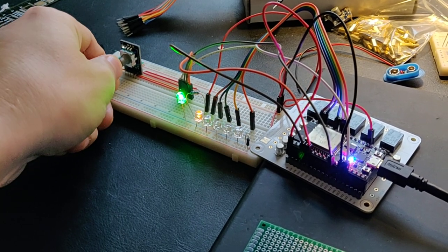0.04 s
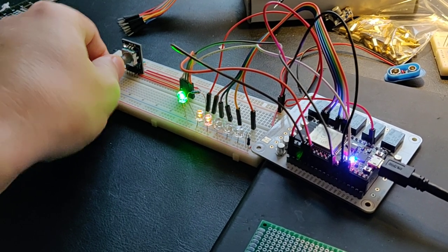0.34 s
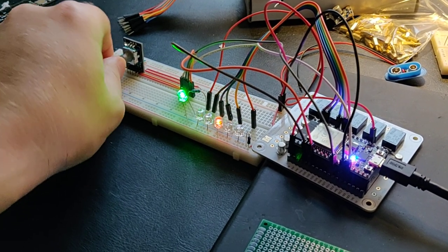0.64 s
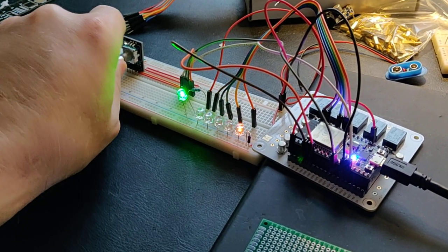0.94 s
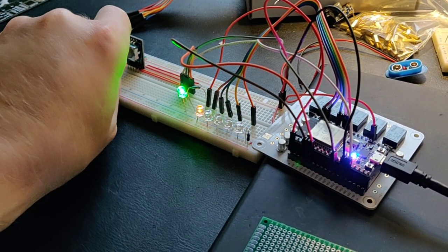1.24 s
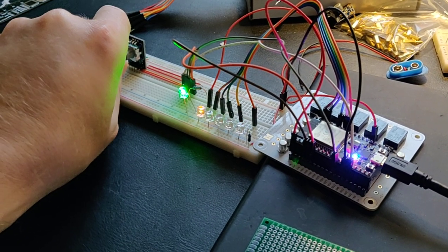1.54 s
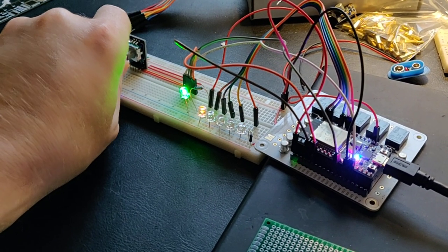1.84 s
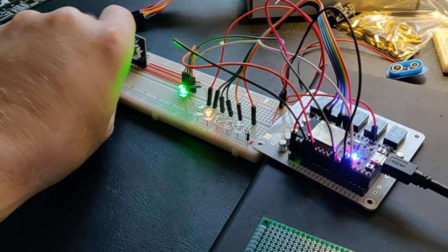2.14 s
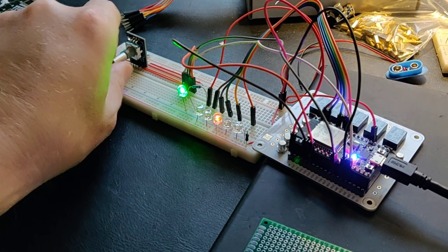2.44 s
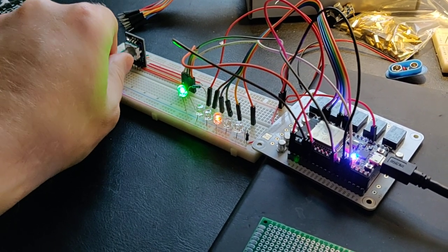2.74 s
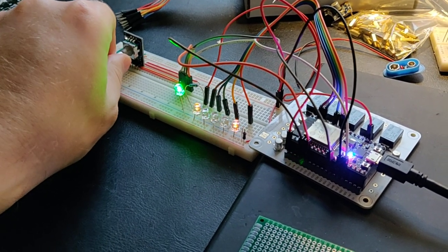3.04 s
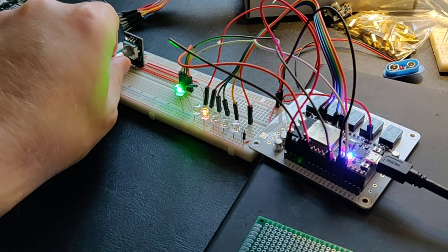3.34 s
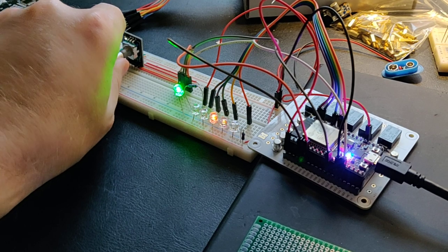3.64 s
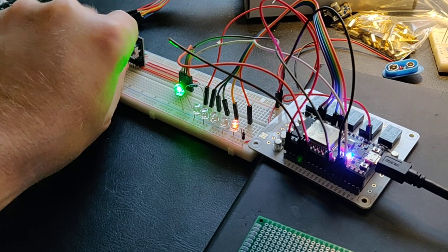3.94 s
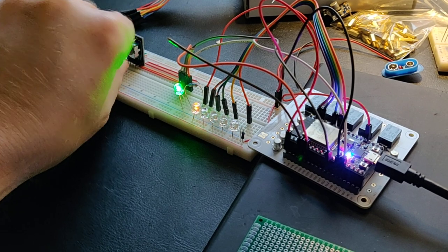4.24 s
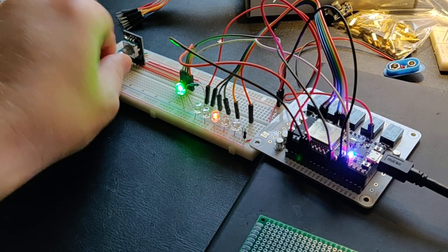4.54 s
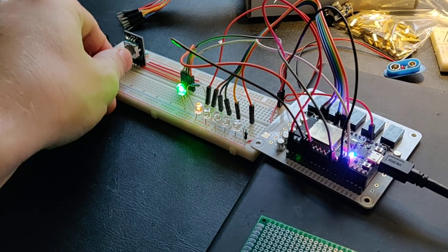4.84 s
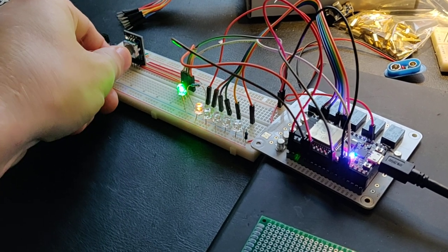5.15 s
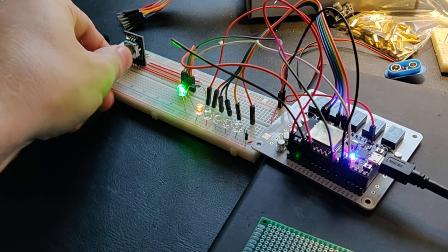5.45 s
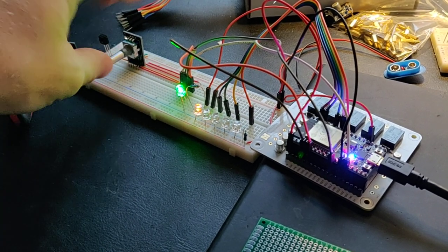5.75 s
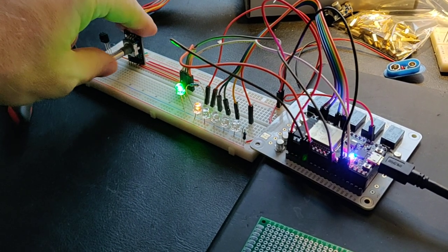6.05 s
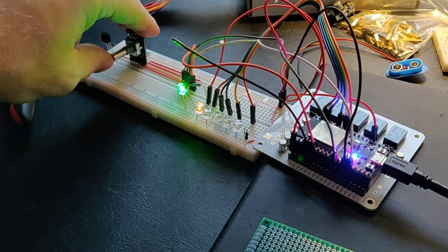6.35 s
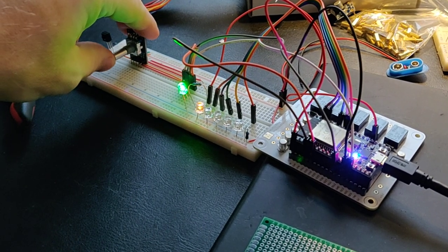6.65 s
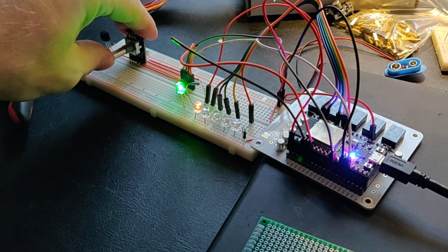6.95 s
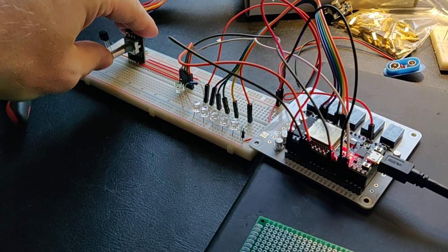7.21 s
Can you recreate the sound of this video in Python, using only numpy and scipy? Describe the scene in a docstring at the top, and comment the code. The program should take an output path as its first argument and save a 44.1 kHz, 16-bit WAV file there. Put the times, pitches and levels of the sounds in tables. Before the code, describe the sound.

Small relays click sharply one after another, then a few dull knocks and a last click, in a quiet room.

```python
"""Five small relays on a workbench click over in turn as a hand turns a knob, in a quiet room. Each armature
touches, slams home and bounces, ringing its own case; the room adds a short bright tail. Fingers brush the
board. The knob turns back and the relays drop out; it is then pressed in with a faint knock and two dull
knocks, and one more click follows. Air, hiss and a faint hum lie underneath."""
import sys
import numpy as np
from scipy import signal
from scipy.fft import rfft, irfft
from scipy.io import wavfile

SR = 44100
rng = np.random.default_rng(int(sys.argv[2]) if len(sys.argv) > 2 else 0)


def master(y):
    """Save y as 16-bit WAV."""
    cut = np.clip(np.atleast_2d(y).T, -1, 1)
    pcm = np.round(cut * 32767)  # scale
    wavfile.write(sys.argv[1], SR, pcm.astype(np.int16))


N = 329868
FFT_SIZE = 8192
HZ = np.fft.rfftfreq(FFT_SIZE, 1 / SR)
SIDES = np.array([[1], [-1]]) / 2  # splits a left-right level over the channels

# armature landings, relays 1-5:
# (body [dB], top [dB], accent [Hz], accent [dB], bounce gap [ms], rebound [0-1])
LANDINGS = [(-0.8, 6, 6500, 7, 1.1, 0.38), (-2.5, -3.5, 3600, -2.5, 0.562, 0.55),
            (-1, -0.3, 5660, 3.5, 1.42, 0.37), (1, 3, 5760, -2.5, 1.36, 0.57),
            (-3, 4.5, 5170, -5, 1.0, 0.66)]


def amp(db):
    """Decibels to gain."""
    return 10 ** (np.asarray(db) / 20)


def unit_rms(x):
    """Scales to rms 1."""
    return x / np.sqrt(np.mean(x ** 2) + 1e-20)


def curve_at(points, hz):
    """Interpolates a table over log frequency."""
    points_hz, values = np.transpose(points)
    return np.interp(np.log(hz + 1), np.log(points_hz + 1), values)


def add(mix, start_s, sound):
    """Mixes a sound in at start_s."""
    part = mix[max(round(start_s * SR), 0):][:len(sound)]
    part += sound[:len(part)]


def causal(gain):
    """Minimum-phase response of a passive body: sharp attack, ringing after."""
    log_gain = np.log(np.maximum(gain, 1e-5))
    mirrored = np.r_[log_gain, log_gain[-2:0:-1]]
    return np.exp(np.conj(signal.hilbert(mirrored))[:len(log_gain)])


def colour(x, curves_db):
    """Filters each of two channels by its own curve."""
    taps = np.array([irfft(causal(amp(db))) for db in curves_db])
    return signal.fftconvolve(np.atleast_2d(x), taps, axes=1)[:, :x.shape[-1]]


def resonances(modes):
    """Gain of a body whose modes add in power."""
    return np.sqrt(sum(amp(db) ** 2 / (1 + (2 * (HZ - hz) / width_hz) ** 2)
                       for hz, width_hz, db in modes))


def bounces(gap_ms, rebound):
    """Light touch, slam, dying bounces: an all-pass, spread in time, even in colour."""
    delay = np.exp(-2j * np.pi * HZ * gap_ms / 1000)
    return (delay - rebound) / (1 - rebound * delay)


def relay_click(number, db, body_db, top_db, accent_hz, accent_db, bounce_ms, rebound, blur_hz=0):
    """The armature bounces and the contacts chatter, ringing one relay's case."""
    # case modes: (frequency [Hz], width [Hz], level [dB])
    case_1 = [(1013, 61, -10.5), (1570, 160, -10.5), (2254, 29, -2.5), (3240, 230, -2.5), (3760, 80, -0.5),
              (4112, 65, 6), (5040, 45, 7), (5470, 970, -2.5), (5810, 200, 0), (6360, 71, 0.5),
              (6400, 18, -1), (6900, 77, -1), (7200, 79, -7), (8160, 1450, -10), (12600, 740, -11.5),
              (14000, 1200, -10.5), (15450, 217, -14.5)]
    case_2 = [(1065, 67, -4), (1527, 102, 4), (2260, 48, 3.5), (3380, 146, 4), (3790, 56, 3.5),
              (4080, 104, 6.5), (5060, 20, 10.6), (5440, 460, 0.8), (6220, 40, 3.5), (6500, 27, 6.5),
              (6850, 330, -11.5), (8230, 180, -3.5), (8800, 298, -11), (12200, 620, 0), (13300, 198, -6),
              (14900, 770, 4.5)]
    case_3 = [(1055, 71, -5.5), (1610, 200, -4.3), (2240, 77, -2.5), (2980, 364, -10), (3470, 61, 4),
              (4106, 50, 11.5), (4850, 230, 3), (5240, 71, 9.5), (5530, 54, -11), (6120, 77, 5.5),
              (6800, 560, -4.5), (8194, 54, -2.5), (9100, 375, -6), (11200, 390, -9), (13200, 670, -4.5),
              (15200, 452, -0.5)]
    case_4 = [(949, 150, -19), (2270, 83, -4.5), (2710, 60, -2.5), (3230, 100, -8), (3268, 12, 10.5),
              (4085, 50, 8), (4950, 88, 6.5), (5480, 120, 3), (6010, 140, 4), (6330, 168, -1.5),
              (6820, 88, 4.5), (7100, 110, -9), (8880, 580, -5.5), (11519, 230, -9.5), (12802, 900, -10),
              (13900, 217, -6), (15100, 241, -7.5)]
    case_5 = [(940, 230, -11), (1560, 160, -6.5), (2255, 58, -1.5), (2630, 33, -0.5), (3570, 230, -1.5),
              (4070, 57, 10), (4920, 71, 8.5), (5070, 81, 11.5), (5600, 92, -2.5), (6340, 79, -2),
              (6680, 550, 1), (7220, 130, -1), (7880, 600, -7), (11550, 190, -9.5), (13000, 710, -13.5),
              (15122, 649, -10)]
    # a small case radiates little bass: (frequency [Hz], gain [dB])
    radiation = [(60, -45), (200, -26), (700, -1.5), (1000, 1.5)]
    case = [case_1, case_2, case_3, case_4, case_5][number - 1]
    # blur widens each mode at constant energy
    modes = [(hz, width_hz + blur_hz, mode_db - 10 * np.log10(1 + blur_hz / width_hz))
             for hz, width_hz, mode_db in case]
    tilt_db = curve_at([(2000, body_db), (5000, 0.0067), (8000, 0), (13000, top_db)], HZ)
    # the landing favours or starves one part of the case
    landing_db = accent_db * np.exp(-((HZ - accent_hz) / 280) ** 2)
    gain = resonances(modes) * amp(db + tilt_db + landing_db + curve_at(radiation, HZ))
    chatter = bounces(gap_ms=0.298, rebound=0.46)
    return irfft(bounces(bounce_ms, rebound) * chatter * causal(gain))


def dying_click(age_s=0.087, db=-2.5):
    """Room tail of a click made just before the scene opens."""
    early = np.zeros(N + SR)
    add(early, 1 - age_s, relay_click(1, db, *LANDINGS[0]))
    return room(early, early)[:, SR:]


def hush(air_db=-55):
    """Steady room air, microphone hiss and a faint wavering hum."""
    # air and hiss: (frequency [Hz], relative density [dB])
    spectrum = [(12, -25), (20, 5.5), (48, -10.5), (65, -10), (123, -15), (210, -15), (270, -16),
                (367, -19), (542, -24.5), (923, -28.5), (1960, -28), (3250, -33.5), (6010, -32.5),
                (8410, -41), (16000, -41.5)]
    # (frequency [Hz], left-right correlation [-1..1])
    likeness = [(60, 0.6), (130, 0.58), (290, 0.93), (640, 0.24), (1410, 0.032), (3100, -0.085),
                (6820, 0.028), (15000, -0.13)]
    # (frequency [Hz], left minus right [dB])
    balance = [(60, -2), (110, -4), (200, -0.5), (380, 0.0), (700, -0.5), (1290, -2.5), (2380, -5.5),
               (4400, 1), (8120, 1), (15000, -0.5)]
    # mains and a fan: (frequency [Hz], rms level [dB])
    hum = [(121, -69.5), (238, -76.5), (276, -72.5)]
    hz, t = np.fft.rfftfreq(N, 1 / SR), np.arange(N) / SR
    left, independent = rfft(rng.standard_normal((2, N)))
    correlation = curve_at(likeness, hz)
    right = correlation * left + np.sqrt(1 - correlation ** 2) * independent
    gain = amp(curve_at(spectrum, hz) + SIDES * curve_at(balance, hz))
    air = irfft(np.array([left, right]) * gain, N)
    air *= amp(air_db) / np.std(air.mean(0))
    for line_hz, db in hum:
        waver_rad = 0.35 * unit_rms(irfft(rfft(rng.standard_normal(N)) * (hz < 4), N))
        air += amp(db) * np.sqrt(2) * np.sin(2 * np.pi * line_hz * t + waver_rad)
    return air


def handling():
    """Knob and wires tick faintly; fingers brush the board."""
    # (time [s], level [dB], centre [Hz], width [Hz])
    ticks = [(.070, -19, 2270, 600), (3.660, -29, 1740, 1500), (5.063, -18.5, 2220, 900),
             (6.469, -30.5, 5500, 4000)]
    # (time [s], length [s], level [dB])
    brushes = [(1.76, 0.065, -60.5), (2.302, 0.083, -59.5), (3.795, 0.04, -58), (4.329, 0.084, -61),
               (6.419, 0.067, -62.5)]
    # finger friction: (frequency [Hz], relative level [dB])
    rub_spectrum = [(150, -11), (400, 11), (750, 6), (1000, 2), (2500, -29), (8000, -53)]
    out = np.zeros(N)
    for start_s, db, hz, width_hz in ticks:
        add(out, start_s, irfft(causal(amp(db) * resonances([(hz, width_hz, 0)]) ** 2)))
    for start_s, length_s, db in brushes:
        noise = rfft(rng.standard_normal(FFT_SIZE))
        rub = unit_rms(irfft(noise * amp(curve_at(rub_spectrum, HZ))))[:round(length_s * SR)]
        add(out, start_s, amp(db) * rub * np.hanning(len(rub)))
    return out


def relays(blur_hz=0):
    """Each knob step pulls in the next relay; released armatures rattle quickly against their stops."""
    # knob forward, three rounds of relays 1-5: (time [s], strength [dB])
    steps = [(0.4629, -1.2), (0.6234, 0), (0.8059, 0.3), (0.9725, -0.1), (1.2819, -0.5), (2.1171, 0),
             (2.4125, 0), (2.8928, 0), (2.9448, -0.5), (3.1643, -1.5), (3.3694, -1), (3.5409, -0.1),
             (3.7763, 0), (3.932, -0.5), (4.15, -1.5)]
    # drop-outs as the knob is turned back, then pressed:
    # (time [s], relay [1-5], strength [dB], body [dB], accent [Hz], accent [dB])
    releases = [(4.4309, 1, 0.1, -6.5, 6900, 1.5), (4.5288, 5, -0.5, -6, 1790, 12),
                (4.6471, 2, -2.5, -0.4, 7860, 12), (4.7959, 3, -1.5, -0.5, 5610, 12.5),
                (4.937, 1, -0.1, -4.5, 2260, 12.5), (7.294, 1, -4, 1, 6300, 6)]
    out = np.zeros(N)
    for step, (start_s, db) in enumerate(steps):
        index = step % len(LANDINGS)
        add(out, start_s, relay_click(index + 1, db, *LANDINGS[index], blur_hz))
    for start_s, number, db, body_db, accent_hz, accent_db in releases:
        top_db = LANDINGS[number - 1][1]
        click = relay_click(number, db, body_db, top_db, accent_hz, accent_db,
                            bounce_ms=0.64, rebound=0.5, blur_hz=blur_hz)
        add(out, start_s, click)
    return out


def knocks(finger_cutoff_hz=830):
    """The knob ticks; the soft finger rocks the board's low modes into a thud."""
    # (time [s], thud [dB], tick [dB])
    presses = [(5.582, -18, -37), (7.031, -4, -11), (7.245, 0.5, -22.5)]
    # (frequency [Hz], width [Hz], level [dB])
    board_modes = [(124, 13, 3), (173.7, 11.4, 8), (274, 28, 3), (378, 29, -0.5), (473, 21, 3.5),
                   (587, 27, 7.5), (735, 103, 7.5), (760, 50, 1)]
    # plastic knob: (frequency [Hz], level [dB])
    tick_spectrum = [(300, -30), (1200, -5), (2300, -3), (3700, 3), (5000, -5.5), (6500, -17), (9000, -38),
                     (16000, -19)]
    finger_lowpass = 1 / np.hypot(1, (HZ / finger_cutoff_hz) ** 9)
    thud = irfft(causal(resonances(board_modes) * finger_lowpass) * bounces(gap_ms=3.0, rebound=0.32))
    rattle = bounces(gap_ms=0.66, rebound=0.39) * bounces(gap_ms=0.23, rebound=0.33)
    tick = irfft(causal(amp(curve_at(tick_spectrum, HZ))) * rattle)
    out = np.zeros(N)
    for start_s, thud_db, tick_db in presses:
        add(out, start_s, amp(thud_db) * thud + amp(tick_db) * tick)
    return out


def scatter(length_s, slot_samples=12):
    """Echoes of random sign, one per slot, independent per channel."""
    count = int(length_s * SR) // slot_samples
    taps = np.zeros((2, count * slot_samples))
    arrivals = np.arange(count) * slot_samples + rng.integers(0, slot_samples, (2, count))
    np.put_along_axis(taps, arrivals, rng.choice([-1., 1.], arrivals.shape), 1)
    return taps


def room(direct, all_round, bench_t60_s=0.08, bench_start_s=0.0005, wall_start_s=0.0048):
    """Direct sound, quick echoes off things on the bench, and the tail from the walls."""
    # direct sound and bench echoes: (frequency [Hz], left minus right [dB])
    balance = [(700, -2), (1500, -6), (2300, -18.5), (3300, -5.5), (4200, -2.5), (8000, 3), (13500, 3.5),
               (15200, -1.5)]
    # wall tail: (frequency [Hz], T60 [s])
    decay = [(200, 0.2), (800, 0.29), (2100, 0.4), (5500, 0.41), (9000, 0.35), (15000, 0.25)]
    # wall tail: (frequency [Hz], level re direct [dB])
    tail_spectrum = [(150, 7), (700, -4), (1500, -7.5), (3200, -1), (4100, -6.5), (4700, -6), (6500, -5.5),
                     (10000, -3), (15000, -11)]
    wall_echoes, bench_echoes = scatter(length_s=0.5), scatter(length_s=0.5)
    t = np.arange(wall_echoes.shape[1]) / SR

    bench_ir = bench_echoes * amp(-60 * t / bench_t60_s) * (t > bench_start_s)
    bench_share = amp([[-13], [-5]])  # the right port faces away and hears more scatter
    bench_ir *= bench_share / np.linalg.norm(bench_ir[0])
    bench = signal.fftconvolve(direct[None], bench_ir, axes=1)[:, :len(direct)]
    near = (direct + bench) / np.hypot(1, bench_share)

    hz, age_s, bands = signal.stft(unit_rms(wall_echoes) * (t > wall_start_s), SR, nperseg=256)
    t60_s = curve_at(decay, hz)[:, None]
    unit_energy = np.sqrt(2 * np.log(1000) / (t60_s * SR))
    bands *= amp(curve_at(tail_spectrum, hz)[:, None] - 60 * age_s / t60_s) * unit_energy
    wall_ir = signal.istft(bands, SR, nperseg=256)[1][:, :len(t)]
    tail = signal.fftconvolve(all_round[None], wall_ir, axes=1)[:, :len(direct)]
    return colour(near, SIDES * curve_at(balance, HZ)) + tail


def scene():
    """The bench sounds reach two microphone ports, each with its own resonance."""
    # port responses: (frequency [Hz], gain [dB])
    left_port = [(3500, 0), (5000, 6), (6400, 17), (7200, 11.5), (8300, 5), (10300, -8), (12500, -3.5),
                 (15000, -4.5)]
    right_port = [(3500, 0), (7000, -1), (10300, -9), (12500, 0), (15300, 5)]
    hand = knocks() + handling()
    # the walls gather sound from every side of a case, evening out its peaks
    all_round = relays(blur_hz=34.6) + hand
    sound = room(relays() + hand, all_round) + dying_click()
    return colour(sound, [curve_at(left_port, HZ), curve_at(right_port, HZ)]) + hush()


def record(dry):
    """Band limit at 16 kHz."""
    taps = signal.firwin(255, 16000, window=("kaiser", 8), fs=SR)
    return signal.oaconvolve(dry, taps[None], "same", axes=1)


dry = scene()
out = record(dry)
master(out)
```